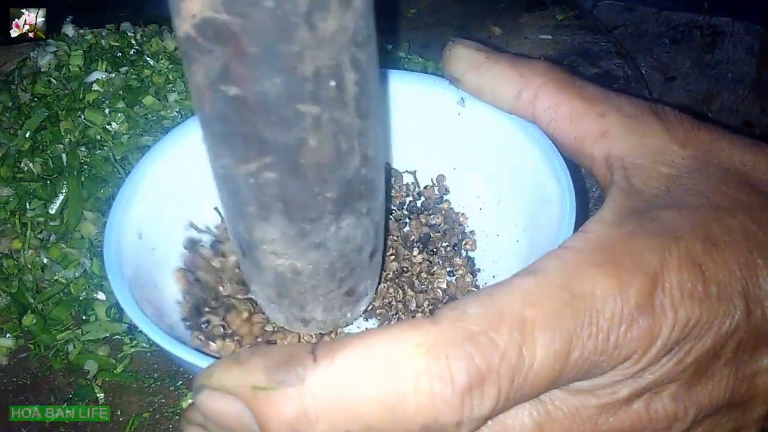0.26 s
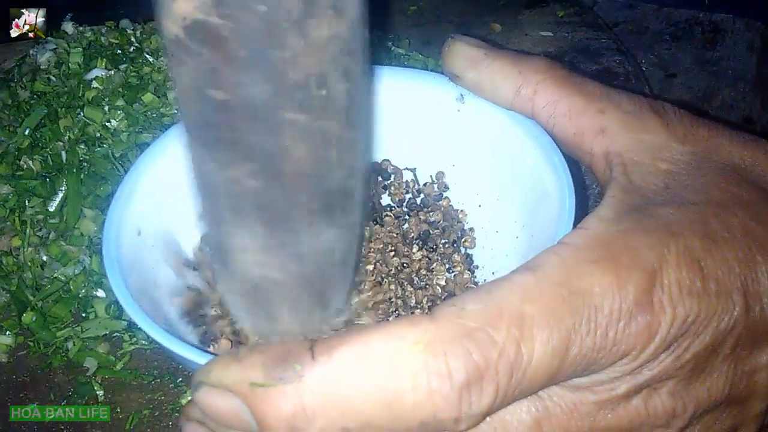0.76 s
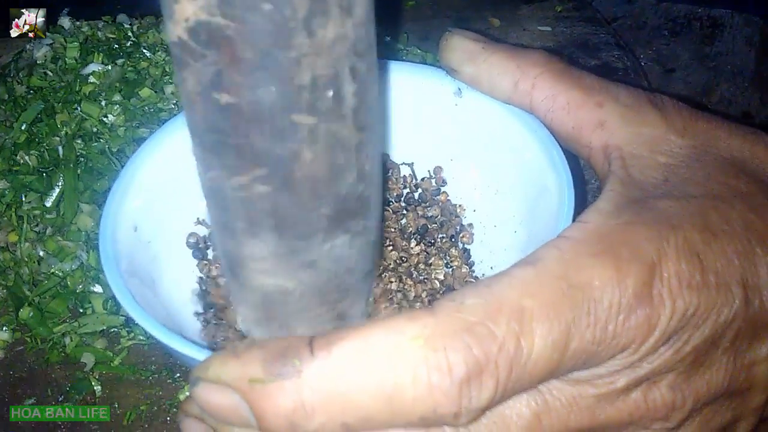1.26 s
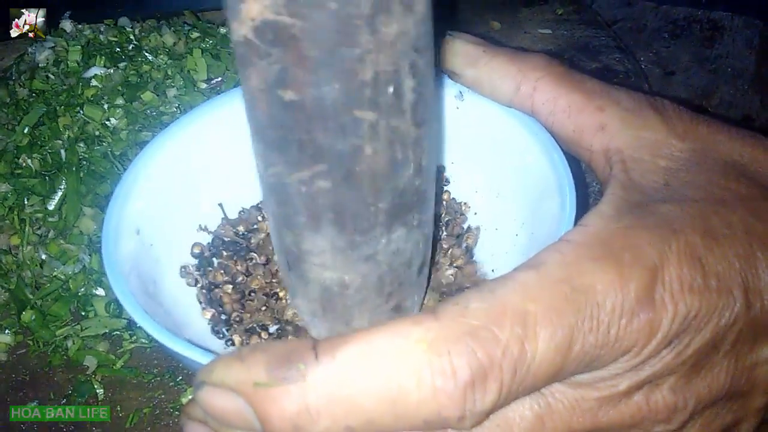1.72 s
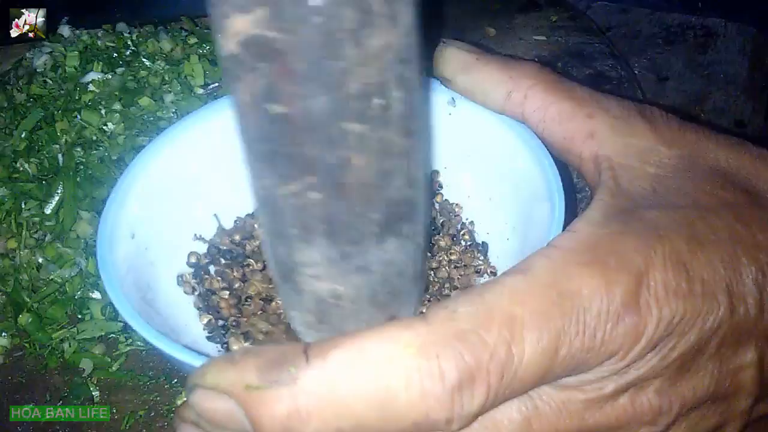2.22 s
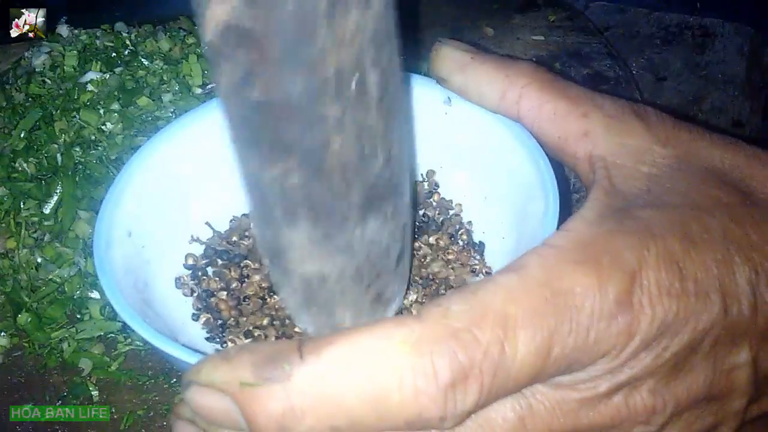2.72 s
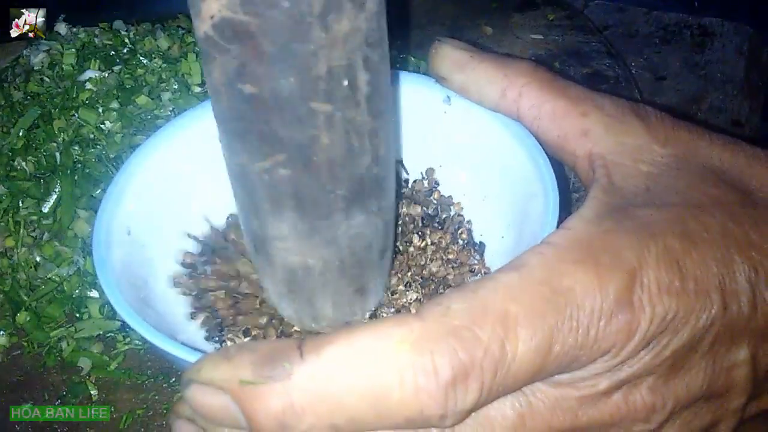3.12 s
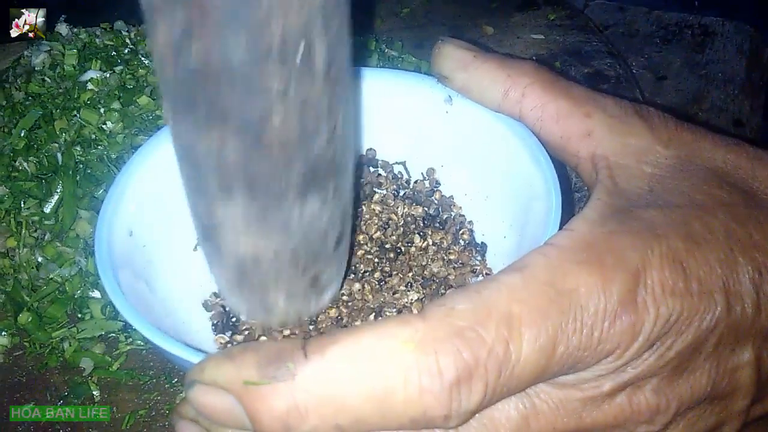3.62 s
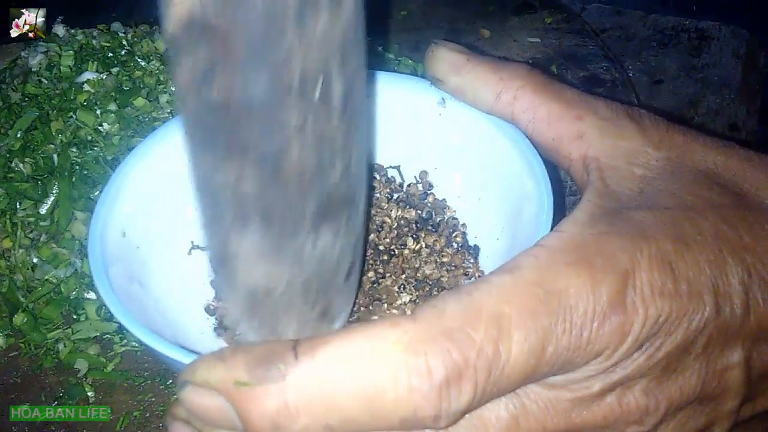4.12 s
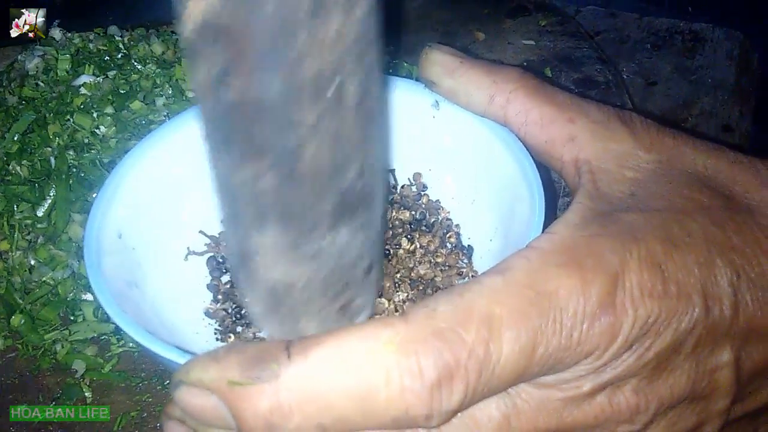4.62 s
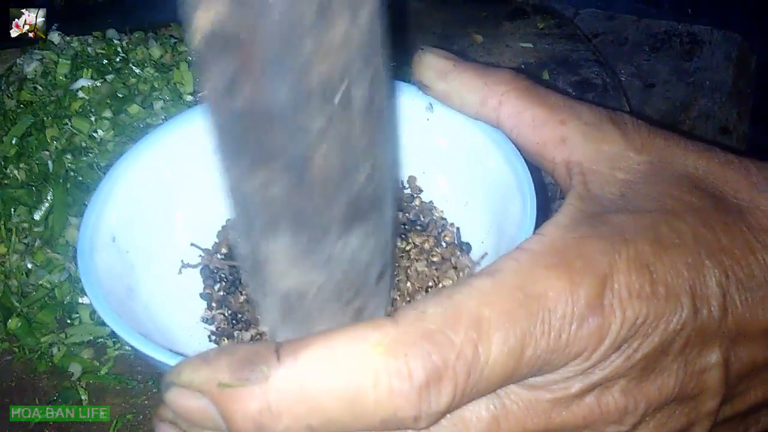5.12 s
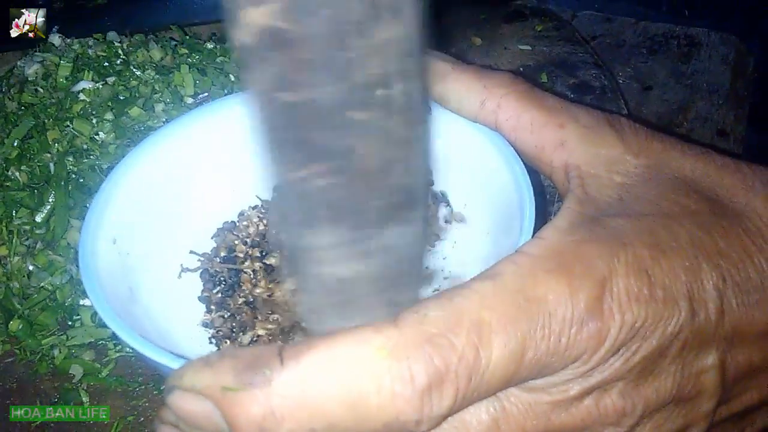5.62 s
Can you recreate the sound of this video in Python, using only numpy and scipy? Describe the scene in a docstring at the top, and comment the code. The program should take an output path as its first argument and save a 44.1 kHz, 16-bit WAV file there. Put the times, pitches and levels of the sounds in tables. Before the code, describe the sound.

A wooden pestle pounds dry seeds in a small hand-held bowl on a wooden board, heard very close. From 0.05 s to 5.8 s come twenty-four strokes about a quarter second apart. Each is brief: a gritty crunch, a dry hard knock on the bottom, a soft low thump of the board, then two hollow little taps as the bowl hops and lands. Loudness and brightness vary; strong knocks fall near 0.3, 2.5, 3.4, 5.0 and 5.6 s, with a brighter one at 5.3. Seeds snap noticeably at 2.0, 3.7 and 5.3 s. The bowl chatters and rings briefly at 3.5 and most clearly at 3.7 s. Around 4.0 s a muffled stroke barely moves the board, and the spacing widens slightly before steady pounding resumes. Near echoes are short, the room faint. Extremely faint thin chirps appear around 2.7-3 and 4.7-5.7 s over a low steady hush.

```python
"""A wooden pestle pounds dry seeds in a small hand-held bowl on a wooden board, close by, in a quiet room.
Each stroke crunches (shaped grainy noise), knocks on the bottom and thumps the board (decaying modes).
The bowl hops and lands twice, the second time softer or harder with its rocking; some seeds snap.
When it rocks free of the hand it chatters (noise taps) and rings (modes).
Behind: echoes off near things and the room, faint thin chirps (narrow-band noise), a steady hush."""
import sys
import numpy as np
from scipy import signal
from scipy.fft import rfft, irfft
from scipy.io import wavfile

SR = 44100
rng = np.random.default_rng(int(sys.argv[2]) if len(sys.argv) > 2 else 0)


def store_wav(level_fs):
    """Save 16-bit WAV to argv[1]."""
    pcm = np.round(np.clip(np.atleast_2d(level_fs), -1, 1) * 32767)
    wavfile.write(sys.argv[1], SR, pcm.T.astype(np.int16))


N = 258422
RING = np.arange(int(.25 * SR)) / SR  # time base of one short sound, s

# pestle strokes: start_s, crunch_db, knock_db, knock_treble_db, weight_on_board_db, hop_s, rocking_db
PESTLE_STROKES = [(0.047, -31.5, -16.5, -11, -23.5, 0.0083, -17),
                  (0.2835, -26, -8.5, -9.5, -23, 0.012, -20), (0.503, -35.5, -18.5, 2, -26.5, 0.0073, -33),
                  (0.7489, -27.5, -16.5, -5.5, -46.5, .012, -72),
                  (1.0189, -28.5, -16, -14, -28.5, 0.0098, -42.5), (1.2942, -23, -21.5, 3, -25, 0.01, -34),
                  (1.5421, -26.5, -29, -8, -23, 0.011, -29.5), (1.784, -27.5, -17, -3.5, -26.5, 0.014, -40),
                  (2.0229, -29.5, -15.5, 3.5, -23, 0.014, -26.5),
                  (2.2505, -26.5, -9.5, 1, -25.5, 0.014, -29.5),
                  (2.4906, -20.5, -5, -1.5, -26.5, 0.012, -21),
                  (2.7335, -24.5, -8, -0.5, -27.5, .0132, -25.5),
                  (2.9628, -28.5, -11.5, -1, -26.5, 0.012, -33.5),
                  (3.1896, -29, -11, 1.5, -24, 0.011, -17.5), (3.433, -28.5, -7.5, 2, -25.5, .0122, -14),
                  (3.6595, -26.5, -12.5, -2.5, -25, 0.012, -18), (3.9763, -28, -28.5, -4.5, -58, 0.01, -76),
                  (4.284, -32.5, -15, -9, -26.5, 0.0097, -46.5),
                  (4.5554, -27.5, -21, -6, -23.5, 0.016, -27.5),
                  (4.8008, -27.5, -16, 2.5, -21.5, 0.011, -20), (5.0426, -25, -7.5, 2.6, -28, 0.016, -29.5),
                  (5.313, -23, -8.5, 11.5, -27, 0.015, -39), (5.574, -24, -6.5, -4.8, -26.5, 0.011, -27),
                  (5.8231, -35, -13.5, -23, -25, 0.0067, -16.5)]
# hard seeds bursting under the pestle: peak_s, pitch_hz, level_db (relative)
SEED_BURSTS = [(0.287, 3500, -21.5), (0.749, 2380, -24.5), (.751, 3400, -27.5), (1.021, 2287, -33),
               (2.025, 2450, -9.5), (2.492, 3450, -23.5), (3.662, 2450, -15.5), (3.979, 1530, -45),
               (4.287, 2380, -37), (5.314, 2400, -11)]
# loose seeds settling: middle_s, level_db
SEED_SETTLES = [(4.052, -55)]
# colour of the seed crunch: frequency_hz, level_db (relative)
SEED_SPECTRUM = [(300, -21.5), (1100, 4), (1480, 13), (2000, 2), (3000, -16.5), (3500, 4.5), (4100, -18.5),
                 (5400, 2), (6800, 1.5), (7900, -22.5), (9500, -9), (11700, -22.5), (13800, -18),
                 (16000, -22.5)]
# bowl bottom, damped by the pestle: frequency_hz, level_db (relative), t60_s
BOTTOM_MODES = [(400, -19, .025), (720, -19, .016), (960, -15, .016), (1480, -3, .02), (1900, 0, .018),
                (2400, -12, .011), (3450, -17, .014), (4900, -14, .008), (6500, -19, .007)]
# pitch of the board's thump, rising at the end, perhaps under a firmer grip: time_s, pitch_hz
BOARD_THUMP_PITCH = [(0, 173), (1, 149.5), (5.2, 157.4), (5.57, 207.4), (5.82, 221)]
# board swaying after the blow: frequency_hz, level_db (relative), t60_s
BOARD_SWAY_MODES = [(59, -4, .15), (100.5, 2.5, 0.15)]
# bowl against board: frequency_hz, level_db (relative), t60_s
BOWL_LANDING_MODES = [(157, -15, 0.013), (391, -16, .03), (631, -18.5, 0.044), (753.6, -7.5, 0.025),
                      (952.7, -1.5, 0.02), (1231.6, 4, 0.013), (1477, -13, .03), (1656, -5, 0.015),
                      (1931, -10.5, 0.017), (2367, -9, 0.0097), (2480, -13, 0.0024), (3940, -20, 0.01),
                      (5070, -12, 0.0054)]
# bowl chattering on its foot: start_s, chatter_db (relative), decay_s, ring_db (relative), favoured_pitch_hz
FOOT_RATTLES = [(.058, -18, .0045, -55, 4550), (.080, -31, 0.015, -27, 4490),
                (0.311, -24.5, 0.0094, -32.5, 4555), (2.521, -27.5, 0.012, -28, 3350),
                (3.469, -20.5, .016, -22.5, 3230), (3.673, -25.5, 0.01, -36.5, 3680),
                (3.693, -17, .01, -11.5, 3680), (4.582, -32, 0.0093, -42, 3780),
                (5.581, -31, 0.021, -23, 3760), (5.833, -21.5, 0.012, -19, 5000)]
# colour of the chatter: frequency_hz, level_db (relative)
CHATTER_SPECTRUM = [(200, -6.5), (900, 3), (1550, 7), (2400, -1.5), (3500, 1), (5000, -7), (6700, -11.5),
                    (8000, -19), (16000, -26.5)]
# lowest note of the bowl: frequency_hz, level_db, t60_s
LOWEST_BOWL_NOTE = [(398, 2.5, 0.15)]
# bowl ringing freely: frequency_hz, level_db (relative), t60_s
FREE_BOWL_MODES = [(595, -14, .12), (743, -14, .12), (1001, -12, .08), (1500, -2, .09), (2331, -15, .09),
                   (2845, -16, .14), (3170, -8, .08), (3340, -6, .07), (3772, -4, .1), (4130, -13, .08),
                   (4475, -9, .15), (5045, -9, .07), (5496, -13, .07), (5959, -11, .05), (6545, -8, .08),
                   (7671, -25, .1)]
# colours of the near echoes, the room and the hush: frequency_hz, level_db (relative)
NEAR_SPECTRUM = [(40, -4.5), (110, -4.5), (260, -4), (450, -2.5), (1000, -10.5), (1900, -12.5), (3500, -10),
                 (7000, -18.5), (16000, -6.5)]
ROOM_SPECTRUM = [(30, 0.5), (55, 7.5), (120, -8), (300, -3.5), (700, -4), (1200, -1), (1900, -6), (3500, 1),
                 (6500, -9), (9000, -3.5), (16000, -14.5)]
HUSH_SPECTRUM = [(30, -7), (200, -8.5), (1000, -0.5), (2400, -3.5), (6900, -11), (8000, -30), (16000, -28)]
# faint thin chirps, perhaps an insect: middle_s, length_s, pitch_hz, level_db
FAINT_CHIRPS = [(2.689, 0.045, 3570, -59), (2.953, 0.35, 3630, -63.5), (4.70, 0.12, 4410, -71),
                (4.884, 0.1, 4320, -60), (5.268, 0.11, 4380, -71), (5.557, 0.37, 4300, -67)]
# upper partials of the chirps: frequency_hz, level_db (relative to the note)
UPPER_PARTIALS = [(7950, -24), (11800, -27)]

# squeeze: 1/e times at the usual knock; hardest as the pestle bottoms out
SQUEEZE_RISE_S, SQUEEZE_FALL_S, SQUEEZE_LAG_S = 0.004655, 0.0036, 0.001117
# deep bed: muffled knock, long squeeze; rise doubles for this much less knock
USUAL_KNOCK_DB, RISE_DOUBLING_DB = -20.5, 39
# louder knock = thinner bed = lower husk cracks
CRACK_HZ, CRACK_HZ_PER_DB = 5210, -50.5
# board: yields just after the knock; rocking bowl thumps it, firm one sways it (per-values: dB per dB)
GIVE_LAG_S, GIVE_PER_ROCK, THUMP_T60_S = .0035, .1, 0.031
SWAY_DB, SWAY_PER_ROCK = -10, -0.13
# landings: first follows the weight, second the rocking; rocking hardens both (per-values: dB per dB)
USUAL_WEIGHT_DB, LANDING_DB, LANDING_PER_WEIGHT = -24, -9, 1.6
USUAL_ROCK_DB, RELANDING_S, RELANDING_DB, RELANDING_PER_ROCK = -26, .029, -21.5, 1
LANDING_TREBLE_DB, TREBLE_PER_ROCK = 2.5, 0.62
# foot scuffs at every second landing (dB, dB per dB)
SCUFF_DB, SCUFF_PER_ROCK, SCUFF_DECAY_S = -39, 1, 0.007
NOTE_DB = -1.5  # lowest bowl note re rocking_db
SEED_ECHO_DB, TONE_ROOM_DB = -1.5, -5.5  # crunch into near echoes, ringing into room
HUSH_DB, TOP_HZ = -78.5, 16000


def crunch(rise_s, fall_s, crack_hz, grain_db=4, grain_hz=2200, crack_db=-6):
    """Husks crack ever harder as the pestle sinks in; the hardest squeeze is mid-sound."""
    t = RING - RING[-1] / 2
    squeeze = np.exp(-np.abs(t / np.where(t < 0, rise_s, fall_s)) ** 1.5)
    cracks = held_levels(grain_db, grain_hz)
    husks = noise(SEED_SPECTRUM, len(t)) + undb(crack_db) * band(crack_hz, width_hz=320, size=len(t))
    return squeeze * cracks / np.sqrt(np.mean(cracks ** 2)) * husks


def seeds():
    """The crunch of each stroke, slower where the bed is deep, and loose seeds settling."""
    out = np.zeros(N)
    for s, db, knock_db, *_ in PESTLE_STROKES:
        rise_s = SQUEEZE_RISE_S * 2 ** ((USUAL_KNOCK_DB - knock_db) / RISE_DOUBLING_DB)
        crack_hz = CRACK_HZ + CRACK_HZ_PER_DB * (knock_db - USUAL_KNOCK_DB)
        sound = crunch(rise_s, SQUEEZE_FALL_S, crack_hz)
        add(out, s + SQUEEZE_LAG_S - RING[-1] / 2, undb(db) * sound)
    for s, db in SEED_SETTLES:
        sound = crunch(rise_s=0.002945, fall_s=0.0068, crack_hz=1480)
        add(out, s - RING[-1] / 2, undb(db) * sound)
    return out


def bursts(width_hz=380, half_length_s=0.0022):
    """A hard seed gives way all at once with a short pitched snap."""
    out = np.zeros(N)
    for s, hz, db in SEED_BURSTS:
        envelope = np.exp(-((RING - RING[-1] / 2) / half_length_s) ** 2)
        snap = band(hz, width_hz, len(RING)) * envelope
        add(out, s - RING[-1] / 2, peak(snap, db - 1))
    return out


def pestle():
    """A dry knock, mirrored at once by the bowl wall; the weight then pushes the board down."""
    out = np.zeros(N)
    for s, _, knock_db, hard_db, weight_db, _, rock_db in PESTLE_STROKES:
        more_rock_db = rock_db - USUAL_ROCK_DB
        knock = ring(BOTTOM_MODES, treble_db=hard_db, pivot_hz=1500) * swell(.00035)
        add(out, s, peak(echo(knock, lag_s=.0021, share=.7), knock_db))
        thump_hz = np.interp(s, *np.transpose(BOARD_THUMP_PITCH))
        thump = ring([(thump_hz, 0, THUMP_T60_S)]) * swell(0.003)
        thump_db = weight_db + GIVE_PER_ROCK * more_rock_db
        add(out, s + GIVE_LAG_S, -peak(thump, thump_db))  # downward push
        sway = ring(BOARD_SWAY_MODES) * swell(0.0082)
        sway_db = weight_db + SWAY_DB + SWAY_PER_ROCK * more_rock_db
        add(out, s + GIVE_LAG_S + 0.0033, peak(sway, sway_db))
    return out


def bounces():
    """The bowl hops and drops back twice with a hollow knock that hand and ground reflect."""
    out = np.zeros(N)
    for s, *_, weight_db, hop_s, rock_db in PESTLE_STROKES:
        more_rock_db = rock_db - USUAL_ROCK_DB
        first_db = LANDING_DB + LANDING_PER_WEIGHT * (weight_db - USUAL_WEIGHT_DB)
        second_db = RELANDING_DB + RELANDING_PER_ROCK * more_rock_db
        hard_db = LANDING_TREBLE_DB + TREBLE_PER_ROCK * more_rock_db
        for lag_s, db in (hop_s, first_db), (RELANDING_S, second_db):
            landing = ring(BOWL_LANDING_MODES, treble_db=hard_db, pivot_hz=1200) * swell(0.0018)
            landing = lowpass(landing, hz=3200)  # contact of finite length: no sharp edge
            add(out, s + lag_s, peak(echo(landing, lag_s=.0032, share=.5), db))
    return out


def rattles(tap_hz=600, tap_db=4.5):
    """Quick uneven taps of the foot share out the energy of the rocking as it dies away."""
    out = np.zeros(N)
    chatters = [(s, db, decay_s) for s, db, decay_s, *_ in FOOT_RATTLES]
    for s, *_, rock_db in PESTLE_STROKES:
        scuff_db = SCUFF_DB + SCUFF_PER_ROCK * (rock_db - USUAL_ROCK_DB)
        chatters.append((s + RELANDING_S, scuff_db, SCUFF_DECAY_S))
    for s, db, decay_s in chatters:
        rocking = swell(0.0012) * np.exp(-RING / decay_s)
        taps = rocking * held_levels(tap_db, tap_hz)
        taps *= np.linalg.norm(rocking) / np.linalg.norm(taps)
        add(out, s, undb(db + 0.5) * taps * noise(CHATTER_SPECTRUM, len(RING)))
    return out


def ringing(favour_db=5, favour_width_hz=300):
    """Rocking wakes the bowl's lowest note; chatter rings the wall, most near the spot's own pitch."""
    out = np.zeros(N)
    for s, *_, rock_db in PESTLE_STROKES:
        note = ring(LOWEST_BOWL_NOTE, drift=0.13) * swell(0.0042)
        add(out, s + GIVE_LAG_S, undb(rock_db + NOTE_DB) * note)
    for s, _, _, ring_db, spot_hz in FOOT_RATTLES:
        modes = []
        for hz, db, t60_s in FREE_BOWL_MODES:
            lift_db = favour_db * np.exp(-((hz - spot_hz) / favour_width_hz) ** 2)
            modes.append((hz, db + lift_db, t60_s))
        wall = ring(modes, drift=0.029) * swell(0.00053)
        add(out, s, peak(wall, ring_db + 2.5))
    return out


def scatter(dry, spread_hz):
    """The bowl radiates unevenly, so reflections blur its resonances: slow random modulation."""
    flutter = lowpass(rng.standard_normal(N), spread_hz)
    return dry * flutter / flutter.std()


def reflections(dry, spectrum, t60_s, onset_s, db):
    """Dense echoes build up and die away; hand and pestle move, so each stroke meets a new pattern."""
    t, out = np.arange(SR) / SR, np.zeros(N)
    shape = np.exp(-np.log(1000) * t / t60_s) * (1 - np.exp(-(t / onset_s) ** 2))
    starts = [max(int((row[0] - .04) * SR), 0) for row in PESTLE_STROKES]
    for start, end in zip(starts, starts[1:] + [N]):
        tail = noise(spectrum, SR) * shape
        add(out, start / SR, signal.fftconvolve(dry[start:end], tail / np.linalg.norm(tail)))
    return undb(db) * out


def chirps(width_hz=90):
    """Thin rasping notes: noise in a narrow resonance, with two weak upper partials."""
    out = np.zeros(N)
    t = np.arange(SR) / SR - .5
    for s, length_s, hz, db in FAINT_CHIRPS:
        note = band(hz, width_hz, len(t))
        for partial_hz, partial_db in UPPER_PARTIALS:
            note = note + undb(partial_db) * band(partial_hz, 2 * width_hz, len(t))
        envelope = np.exp(-(2 * t / length_s) ** 4)
        add(out, s + t[0], undb(db) * note * envelope)
    return out


def hush():
    """Steady coloured noise behind everything."""
    return undb(HUSH_DB) * noise(HUSH_SPECTRUM, N)


def ring(modes, treble_db=0, pivot_hz=1200, drift=1):
    """Decaying sines; pitch and weight vary with the spot struck, hard contact lifts the upper ones."""
    hz, db, t60_s = np.transpose(modes)
    chance_db = 1.5 * rng.standard_normal(len(hz))
    detune = .015 * drift * rng.standard_normal(len(hz))
    lift = np.clip(np.log2(hz / pivot_hz) * 3, 0, 1)  # full 1/3 octave above the pivot
    gain = undb(db + chance_db + treble_db * lift)
    phase = 2 * np.pi * np.outer(hz * (1 + detune), RING)
    return gain @ (np.sin(phase) * np.exp(-np.log(1000) * RING / t60_s[:, None]))


def swell(rise_s):
    """A push that takes a moment to build."""
    return 1 - np.exp(-RING / rise_s)


def echo(sound, lag_s, share):
    """A sound with one close reflection."""
    return sound + share * np.interp(RING - lag_s, RING, sound, left=0)


def held_levels(spread_db, rate_hz):
    """Random gains, each held for one grain."""
    return undb(spread_db * rng.standard_normal(len(RING)))[(RING * rate_hz).astype(int)]


def noise(spectrum, size):
    """Noise of rms 1, coloured by interpolating dB over log frequency."""
    hz, db = np.transpose(spectrum)
    bins_hz = np.maximum(np.fft.rfftfreq(size, 1 / SR), 1)
    gain = undb(np.interp(np.log(bins_hz), np.log(hz), db))
    y = irfft(rfft(rng.standard_normal(size)) * gain, size)
    return y / y.std()


def band(hz, width_hz, size):
    """Noise of rms 1 in one resonance."""
    offset = (np.fft.rfftfreq(size, 1 / SR) - hz) / width_hz
    y = irfft(rfft(rng.standard_normal(size)) / (1 + offset ** 2), size)
    return y / y.std()


def lowpass(sound, hz):
    """Second-order rounding-off of fast changes."""
    return signal.sosfilt(signal.butter(2, hz, fs=SR, output="sos"), sound)


def undb(db):
    """Decibels to gain."""
    return 10 ** (np.asarray(db) / 20)


def peak(sound, db):
    """Scale to a peak level."""
    return sound * undb(db) / np.abs(sound).max()


def add(track, s, sound):
    """Mix a sound in at a time; what falls outside the track is dropped."""
    start = int(round(s * SR))
    part = sound[max(-start, 0):max(N - start, 0)]
    track[max(start, 0):max(start, 0) + len(part)] += part


def scene():
    """The pounding, echoes off near things, the faint room, chirps and the hush."""
    husks = seeds() + bursts()
    knocks = pestle() + bounces() + rattles()
    tones = ringing()
    to_near = scatter(knocks + undb(SEED_ECHO_DB) * husks, spread_hz=110.7)
    near = reflections(to_near, NEAR_SPECTRUM, t60_s=0.093, onset_s=0.0053, db=-6)
    to_room = scatter(husks + knocks + undb(TONE_ROOM_DB) * tones, spread_hz=380)
    room = reflections(to_room, ROOM_SPECTRUM, t60_s=0.46, onset_s=0.018, db=-26.5)
    return (husks + knocks + tones + near + room + chirps() + hush())[None]


def record(dry):
    """The microphone drops the deepest bass and cuts the top."""
    lean = signal.sosfilt(signal.butter(4, 42, "high", fs=SR, output="sos"), dry)
    return signal.sosfilt(signal.ellip(8, .2, 70, TOP_HZ, fs=SR, output="sos"), lean)


dry = scene()
out = record(dry)
store_wav(out)
```